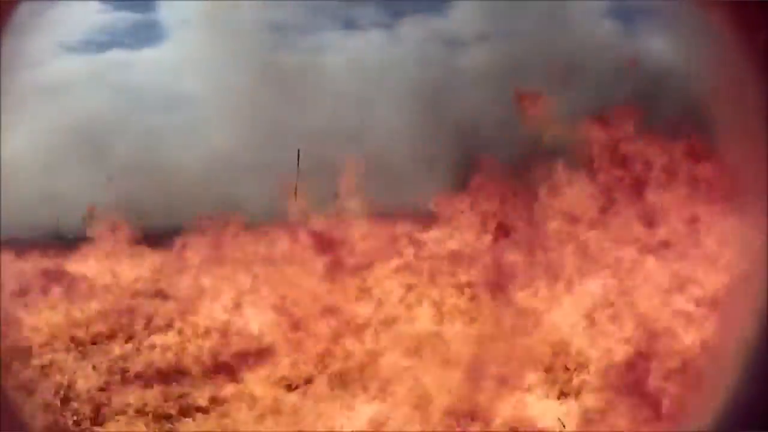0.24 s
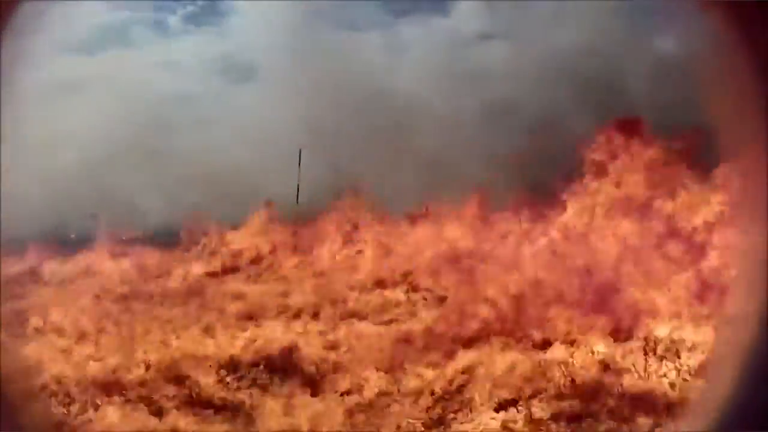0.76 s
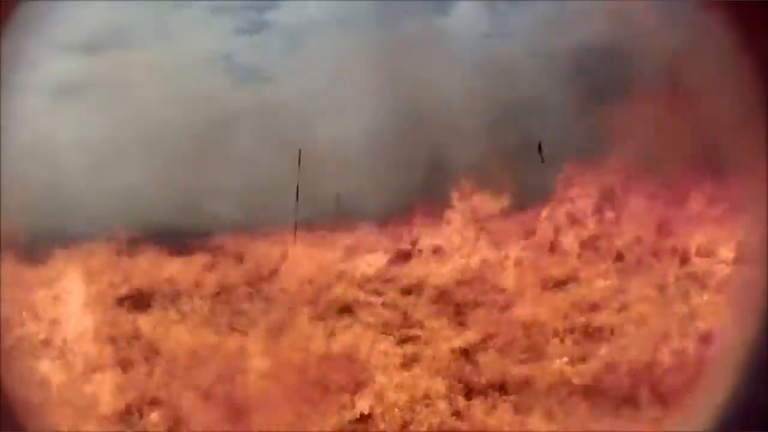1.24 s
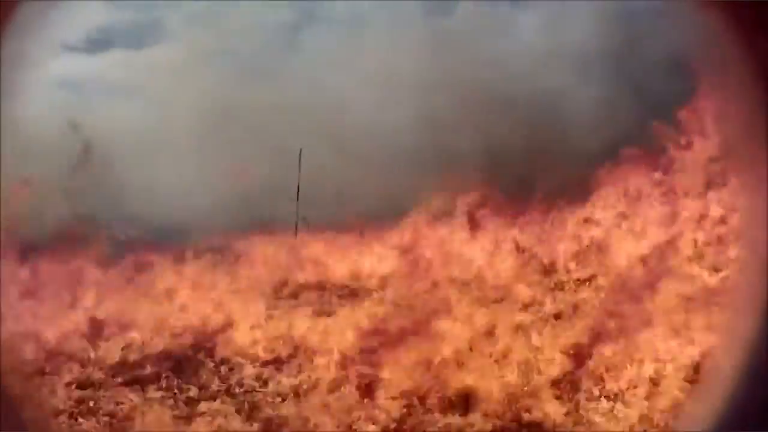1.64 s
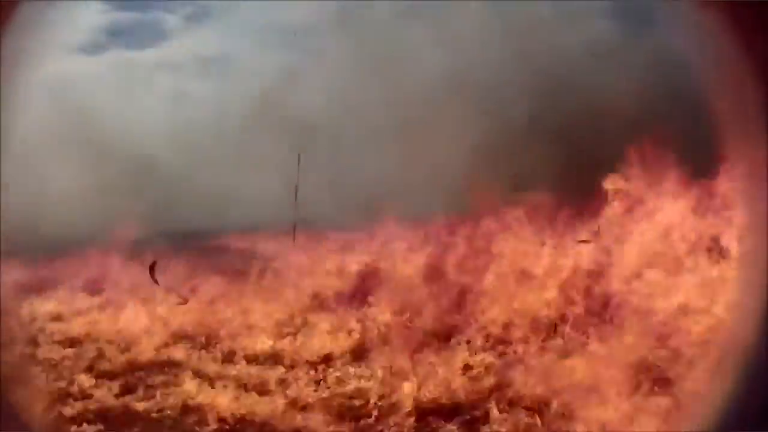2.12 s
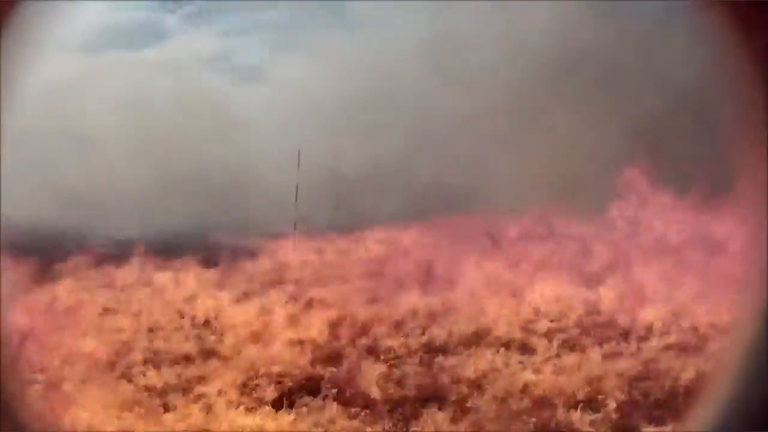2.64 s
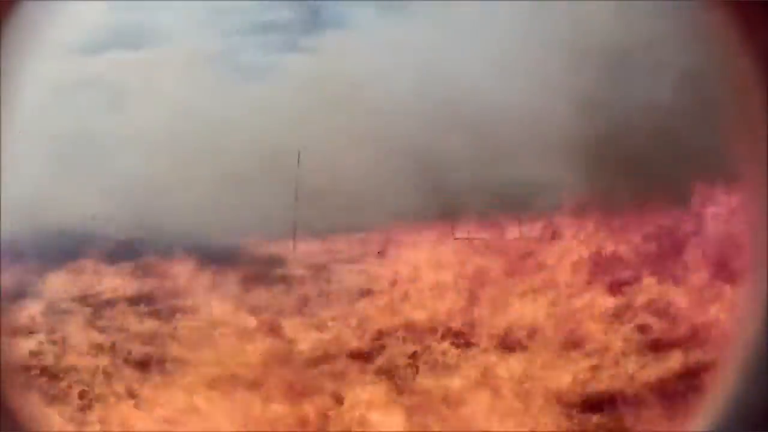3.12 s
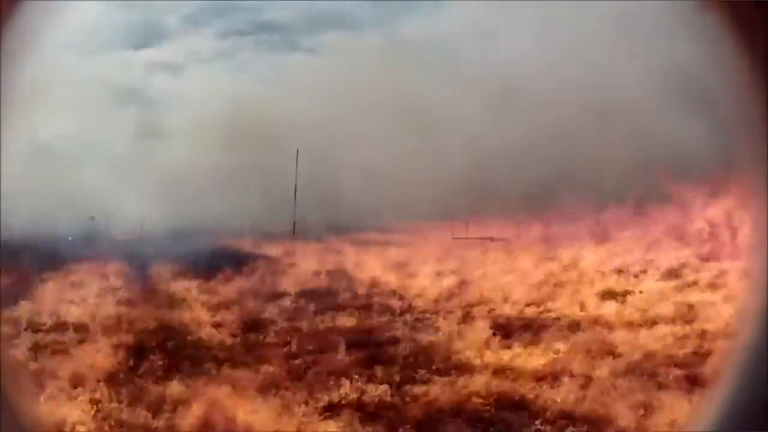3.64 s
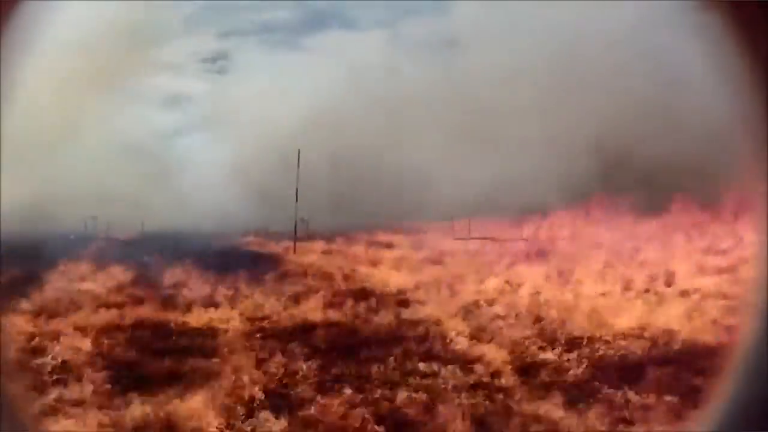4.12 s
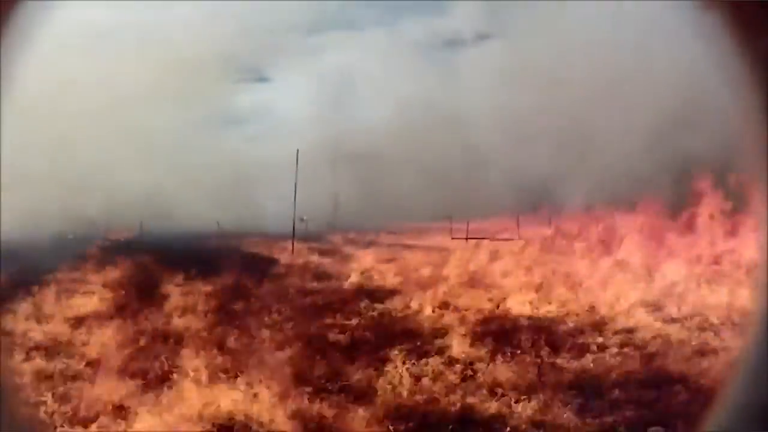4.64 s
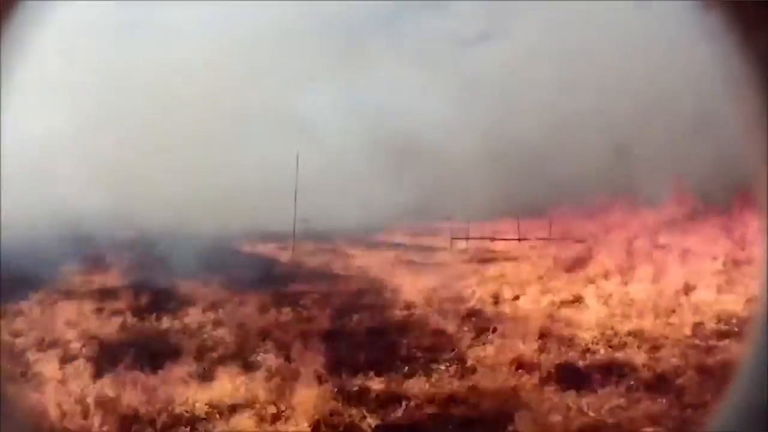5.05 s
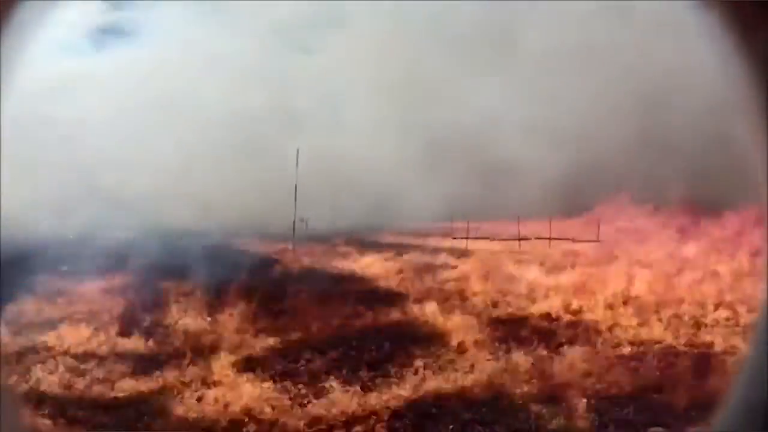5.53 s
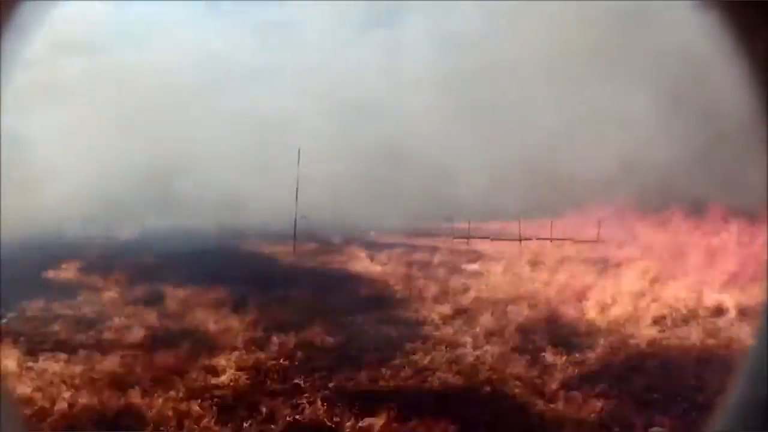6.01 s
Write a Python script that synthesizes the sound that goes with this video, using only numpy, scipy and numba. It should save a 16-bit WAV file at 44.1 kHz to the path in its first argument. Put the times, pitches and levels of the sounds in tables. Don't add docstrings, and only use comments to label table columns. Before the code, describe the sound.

Gusty wind thumps and rumbles on a boxed-in microphone while a grass fire roars, hisses and crackles close by, then dulls and recedes.

```python
import sys
import numpy as np
from scipy import signal
from scipy.fft import rfft, irfft, next_fast_len
from scipy.io import wavfile
from scipy.ndimage import uniform_filter1d
from numba import njit

SR = 44100
rng = np.random.default_rng(int(sys.argv[2]) if len(sys.argv) > 2 else 0)


def inscribe(sig):
    pcm = np.round(np.clip(np.atleast_2d(sig).T, -1, 1) * 32767)
    wavfile.write(sys.argv[1], SR, pcm.astype(np.int16))


def rack_gain(trim_db):
    fader = np.asarray(trim_db, float)
    return 10 ** (fader / 20)


N = 276502
TIME = np.arange(N) / SR
ROAR_TOP_HZ, SIZZLE_FROM_HZ = 1550, 4950


def level(x, db=0):
    return x * rack_gain(db) / np.sqrt(np.mean(x ** 2))


def smooth(x, samples):
    return uniform_filter1d(uniform_filter1d(x, samples), samples)


def through(x, response):
    size = next_fast_len(N + SR // 4)
    hz = np.arange(1, size // 2 + 2) * SR / size
    return irfft(rfft(x, size) * response(hz), size)[:N]


def walk(rate):
    hold = int(SR / rate)
    steps = np.repeat(rng.standard_normal(N // hold + 1), hold)
    return 2.15 * smooth(steps, hold)[:N]


def add(track, s, piece):
    at = int(s * SR) + np.arange(len(piece))
    inside = (at >= 0) & (at < N)
    track[at[inside]] += piece[inside]


def swell(s, length):
    rise_over_fall = 0.74
    t = (TIME - s) / length
    stretch = np.where(t < 0, 1 / np.sqrt(rise_over_fall), np.sqrt(rise_over_fall))
    return np.exp(-np.log(16) * (t * stretch) ** 2)


# t/s, peak level/dB, length/s
GUST_SWELLS = [(0.028, -16.5, 0.19), (0.433, -20.5, 0.061), (0.7, -23.5, 0.28), (1.229, -12.5, 0.12),
               (1.514, -21.5, 0.15), (2.042, -19.5, 0.23), (2.336, -13, 0.091), (2.42, -16, 0.089),
               (2.627, -19.5, 0.2), (2.86, -19, .2), (3.057, -16, .08), (3.14, -11, .12),
               (3.384, -20.5, 0.062), (3.884, -19.5, .12), (4.169, -22.5, 0.059), (4.312, -18, 0.062),
               (4.554, -24.5, 0.39), (4.702, -22, 0.057), (5.013, -18, 0.24), (5.265, -15, 0.094),
               (5.506, -19.5, 0.26), (5.688, -25.5, 0.13), (5.87, -19.5, 0.14), (6.02, -15.5, 0.16),
               (6.256, -16, 0.072)]


def gust_db():
    power = rack_gain(-24) ** 2
    for s, db, length in GUST_SWELLS:
        power = power + rack_gain(db) ** 2 * swell(s, length)
    return 10 * np.log10(power)


# f/Hz, level/dB per Hz
AIR_COLOUR = [(12, -46), (20, -9.5), (76, 2), (113, -1), (138, -4), (184, -11.5), (222, -16.5), (400, -41),
              (520, -75), (880, -120)]


def rumble(gust):
    colour_hz, colour_db = np.transpose(AIR_COLOUR)
    air = through(rng.standard_normal(N),
                  lambda hz: rack_gain(np.interp(np.log(hz), np.log(colour_hz), colour_db)))
    swing = np.sqrt(smooth(air ** 2, 1200))
    air = level(air / swing ** 0.8)
    flutter_db = 2 * walk(25)
    return air * rack_gain(gust - 1 + flutter_db)


# t/s, peak level/dB, f/Hz, width/ms
EDDIES = [(0.435, -5.5, 111, 16), (0.509, -2.5, 89.5, 7.4), (0.778, -8, 102, 15),
          (1.185, -11.5, 83, 11), (1.25, -6, 106.5, 30), (1.291, -5, 110, 25), (1.451, -3.5, 96, 6.5),
          (1.719, -7, 87.5, 12.5), (2.305, -4, 95.5, 11), (2.357, -3.5, 92, 33), (2.381, 1, 100, 5),
          (2.435, -1.5, 89, 7.7), (2.925, -7.5, 89, 7.1), (3.063, -4, 126, 5.1), (3.118, -3, 110, 13),
          (3.162, 1.5, 83, 11), (3.4065, 4, 120, 7.5), (3.434, -6, 94, 15), (3.89, -6, 95.6, 24),
          (4.131, -3.5, 75, 6.4), (4.332, -2, 78.4, 7), (4.404, -3, 98, 8.7), (4.59, -0.5, 77, 9.8),
          (4.922, -0.5, 82.5, 8.2), (4.989, -1, 114, 17.4), (5.071, -4, 79, 24),
          (5.263, -7.5, 101.8, 80), (5.359, -6, 85, 7), (5.896, -10, 95, 44), (6.006, -1, 115, 25.5)]
# t/s, peak level/dB
FURTHER_EDDIES = [(0.009, -12.5), (0.057, -15), (0.12, -13), (0.303, -8.5), (1.223, -8), (1.842, -8),
                  (1.976, -8), (2.063, -9.5), (2.138, -6.5), (2.179, -9.5), (2.548, -11), (2.96, -8.5),
                  (2.989, -11), (3.098, -3), (3.196, -8), (3.254, -8), (3.333, -8.5), (3.672, -10),
                  (3.989, -10), (4.154, -7), (4.352, -4.5), (4.702, -8), (4.739, -5), (5.383, -9),
                  (5.407, -1.5), (5.433, -7), (6.084, -8.5), (6.147, -11.5), (6.204, -9.5), (6.233, -8)]


def thumps():
    eddies = list(EDDIES)
    for s, db in FURTHER_EDDIES:
        hz = 95.8 * np.exp(0.14 * rng.standard_normal())
        ms = 13 * np.exp(0.25 * rng.standard_normal())
        eddies.append((s, db, hz, ms))

    swings, puffs = np.zeros(N), np.zeros(N)
    t = np.arange(-2646, 2646) / SR
    for s, db, hz, ms in eddies:
        strength = min(rack_gain(db - 2.5), 0.8)
        bell = strength * np.exp(-np.log(2) * (t * 2000 / ms) ** 2)
        phase = -0.1 + 0.12 * rng.standard_normal()
        add(swings, s + t[0], -bell * np.cos(2 * np.pi * (hz * t + phase)))
        add(puffs, s + t[0], bell)

    steep = through(swings ** 2, lambda hz: 1 / (1 + (150 / hz) ** 4))
    swirls = level(through(rng.standard_normal(N), lambda hz: (hz / 200) ** 3 / (1 + (hz / 200) ** 7.33)))
    blows = swings - 0.19 * steep + rack_gain(-20) * puffs * swirls
    return blows, uniform_filter1d(puffs, 900)


def wind_on_port(gust):
    blows, reach = thumps()
    wind = rumble(gust) / (1 + 0.92 * reach) + blows
    deep = through(wind, lambda hz: 1 / (1 + (hz / 170) ** 6))
    flames_gone_s, thinning_s, swirl_db = 3.5, 0.05, (3, -4)
    gone = (1 + np.tanh((TIME - flames_gone_s) / thinning_s)) / 2
    return deep + (wind - deep) * rack_gain(swirl_db[0] + (swirl_db[1] - swirl_db[0]) * gone)


# f/Hz, width/Hz, level/dB
CASE_RESONANCES = [(659, 91, -17.5), (1015, 67.5, -1.5), (1234, 126, -2.5), (1867, 240, -5.5),
                   (2494, 417, -2.5), (3160, 465, -1.5), (3470, 171, 4.5), (3848, 227, 2),
                   (4480, 262, -1.5), (5196, 108, -5), (5466, 164, -6), (6060, 385, -6.5), (6510, 520, -8),
                   (7284, 384, -9.5), (8410, 590, -15), (9880, 1060, -24), (10430, 520, -24),
                   (12100, 1200, -40)]


def case(hz):
    total = 0
    for k, (f, width, db) in enumerate(CASE_RESONANCES):
        damping = 1j * hz * width
        total = total + (-1) ** k * rack_gain(db) * damping / (f * f - hz * hz + damping)
    return total


def heard(x):
    low = through(x, lambda hz: case(hz) / (1 + (hz / ROAR_TOP_HZ) ** 8))
    low_and_middle = through(x, lambda hz: case(hz) / (1 + (hz / SIZZLE_FROM_HZ) ** 8))
    whole = through(x, case)
    return np.array([level(low), level(low_and_middle - low), level(whole - low_and_middle)])


# t/s, peak level/dB, bright edge level/dB, f/Hz
NEAR_STALKS = [(0.1225, -14, -14, 3470), (0.137, -14.5, -10, 2700), (0.2508, -12.5, -17.5, 3570),
               (0.3694, -13.5, -11.5, 3780), (0.409, -13, -15, 3700), (0.5905, -19, -15, 3470),
               (0.6395, -18, -19, 3600), (0.7776, -17, -13, 3490), (0.921, -17, -11, 4490),
               (1.1345, -15, -2.5, 3440), (1.1557, -15, -18, 2530), (1.435, -12, -10, 2480),
               (1.5943, -16, -19, 4530), (1.6374, -18, -11.5, 4480), (1.8372, -17.5, -20, 3940),
               (1.8653, -22, -4, 3810), (2.0573, -18, -27, 3220), (2.117, -17.5, -11, 3400),
               (2.5185, -21, -13, 3470), (2.657, -22, -9, 3630), (2.8279, -24, -8, 3450),
               (3.728, -33.5, -19, 3600), (3.7773, -27.5, -9.5, 3500), (4.079, -26, -19, 3760),
               (4.2374, -16.5, -10.5, 3180), (4.4902, -22.5, -21.5, 3780), (4.5182, -22.5, -16.5, 3460),
               (5.4711, -16.5, -24, 3580), (5.576, -13.5, -17, 3250), (6.0245, -20, -16.5, 3500)]


def snaps(blaze):
    stalks = list(NEAR_STALKS)
    for s in rng.random(130) * (N - 1) / SR:
        db = blaze[int(s * SR)] + 12 + 2 * rng.standard_normal()
        edge_db = -18.5 + 3.5 * rng.standard_normal()
        stalks.append((s, db, edge_db, 3600 * np.exp(0.12 * rng.standard_normal())))

    out, size = np.zeros(N), 1500
    t = np.arange(size) / SR
    hz = np.arange(1, size // 2 + 2) * SR / size
    low = 1 / (1 + (hz / ROAR_TOP_HZ) ** 8)
    high = 1 - 1 / (1 + (hz / SIZZLE_FROM_HZ) ** 8)
    crack_and_tail = np.exp(-t / 0.00051) + 0.15 * np.exp(-t / 0.0052)
    shape = (1 - np.exp(-t / 0.0002)) * crack_and_tail * (t < 0.022)
    for s, db, edge_db, own_hz in stalks:
        burst = rfft(rng.standard_normal(size) * shape) * case(hz)
        knock_db = 3.5 * rng.standard_normal() + 0.41 * (-30.5 - db) - 7
        middle = (1 - low - high) / np.sqrt(1 + (np.log(hz / own_hz) / 0.25) ** 4)
        edge = high * (hz / 7000) ** 0.45
        for part, part_db in ((low, knock_db - 2), (middle, -4.5), (edge, edge_db + 5)):
            piece = irfft(burst * part, size)
            add(out, s + 0.00017, piece * rack_gain(db + part_db) / np.abs(piece).max())
    return out


# t/s, blaze level/dB, extra roar level/dB
FIERCENESS = [(0.0, -41.5, 7), (0.12, -31, 3), (0.28, -35, 0.1), (1.03, -36.5, -2), (1.19, -39, 4.4),
              (1.64, -39.5, -0.3), (2.34, -42, 0.6), (2.85, -39.5, 2.2), (2.97, -42, 0.5), (3.12, -45.5, 1),
              (3.32, -51.5, 5.5), (3.58, -48, -1.7), (3.67, -49, -0.8), (4.28, -45, -2.8), (5.2, -48, 1.5),
              (5.83, -42.5, -1), (6.02, -47, 3), (6.27, -49, -2)]


def burning():
    s, blaze, extra_roar = np.transpose(FIERCENESS)
    return np.interp(TIME, s, blaze), np.interp(TIME, s, extra_roar)


# t/s, rise level/dB, length/s
CATCHING_PATCHES = [(0.59, 2.5, .15), (1.14, 3.5, 0.073), (1.475, 3, 0.22), (1.897, 3, 0.14),
                    (2.34, 3, 0.083), (2.85, 1.5, 0.076), (3.1, 2, 0.088), (3.766, 2.5, 0.064),
                    (4.07, 4, 0.1), (4.247, 4, 0.12), (4.82, 2.5, 0.26), (5.16, 3, 0.1), (5.608, 0, 0.11)]


def flares_db():
    return sum(db * swell(s, length) for s, db, length in CATCHING_PATCHES)


def pops(per_s, spread_db, length_ms):
    loudness = rack_gain(-spread_db * np.log(1 - 0.975 * rng.random(N)))
    starts = (rng.random(N) < per_s / SR) * loudness
    envelope = signal.lfilter([1], [1, -np.exp(-1000 / (length_ms * SR))], starts)
    return envelope * rng.standard_normal(N)


def flame_body(blaze, gust):
    body_db = -42.5 + 0.37 * (gust - gust.mean()) + 0.23 * (blaze - blaze.mean())
    body = through(rng.standard_normal(N), lambda hz: (hz / 260) ** 3 / (1 + (hz / 260) ** 4.93)
                   / (1 + (hz / 1000) ** 6))
    return level(body) * rack_gain(body_db + 1 + 0.48 * walk(30))


def front(blaze, extra_roar, gust):
    far = 1 - np.exp(-TIME / 1.95)
    flare = flares_db()
    roar_db = blaze - 3 + 4.5 * far + extra_roar + flare
    crackle_db = blaze + flare
    sizzle_db = blaze - 3 - 6.5 * far + 1.2 * flare
    part_db = np.array([roar_db + 2.5, crackle_db + 1.5, sizzle_db + 1.5])

    hiss = heard(rack_gain(0.25 * walk(25.56)) * rng.standard_normal(N))
    broad = heard(pops(per_s=170, spread_db=3.3, length_ms=2.9))
    narrow = [heard(pops(per_s=220, spread_db=4.1, length_ms=1.94))[k] for k in range(3)]
    shares = np.array([[0.47, 0.16, 0.13], [0.31, 0.26, 0.13], [0.41, 0.29, 0.33]])
    mix = np.sum(np.sqrt(shares.T)[:, :, None] * [hiss, broad, narrow], axis=0)
    flicker = rack_gain(np.array([1.08 * walk(7.9), 0.75 * walk(11), walk(20)]))
    return flame_body(blaze, gust) + np.sum(mix * flicker * rack_gain(part_db), axis=0)


@njit
def follow(x, attack, release):
    out, e = np.empty(len(x)), 0.
    for i in range(len(x)):
        e += (x[i] - e) * (attack if x[i] > e else release)
        out[i] = e
    return out


def gain_control(wind):
    push = follow(np.abs(wind), 1 / (0.0085 * SR), 1 / (0.25 * SR))
    return np.minimum(1, 0.22 / (push + 1e-9)) ** 0.5


def scene():
    gust = gust_db()
    blaze, extra_roar = burning()
    wind = wind_on_port(gust)
    fire = gain_control(wind) * front(blaze, extra_roar, gust)
    return (wind + snaps(blaze) + fire)[None]


def top_cut(x):
    return signal.sosfilt(signal.butter(12, 15650, fs=SR, output="sos"), x)


def record(dry):
    hiss = level(through(rng.standard_normal(N), lambda hz: 1 / (1 + (hz / 12000) ** 2.3)))
    hiss_db = -60.5 + np.maximum(TIME - 3.1, 0)
    soft = np.tanh(0.28 * (dry[0] + hiss * rack_gain(hiss_db))) / 0.3
    mix = through(soft, lambda hz: hz < 15740)[None]
    return top_cut(mix)


dry = scene()
out = record(dry)
inscribe(out)
```